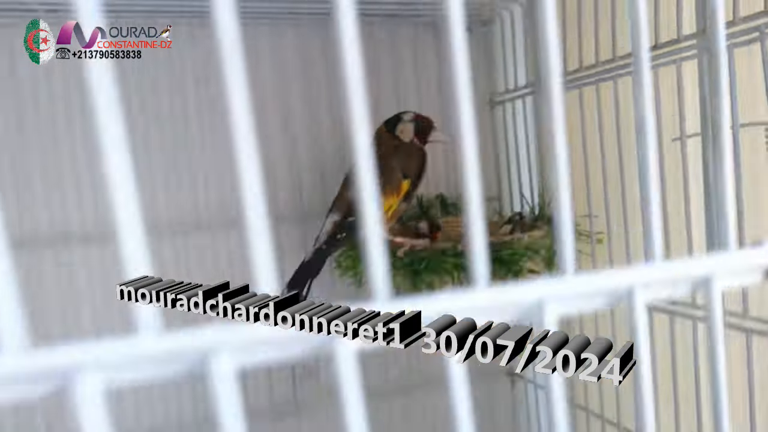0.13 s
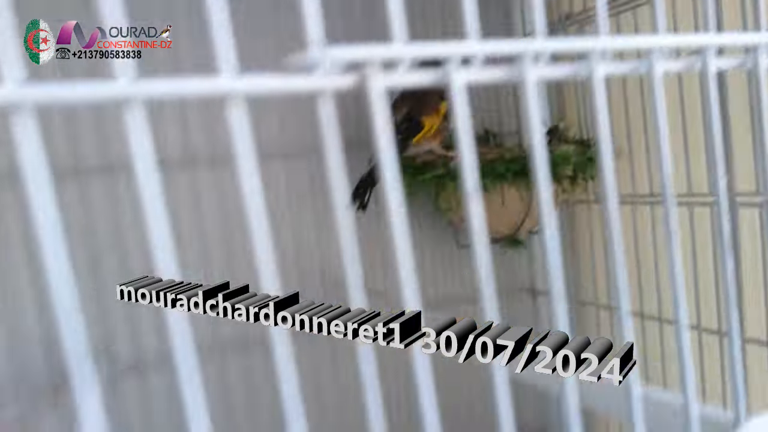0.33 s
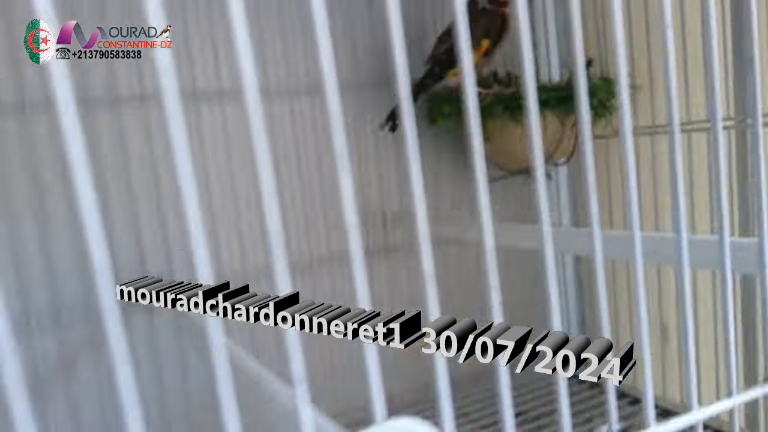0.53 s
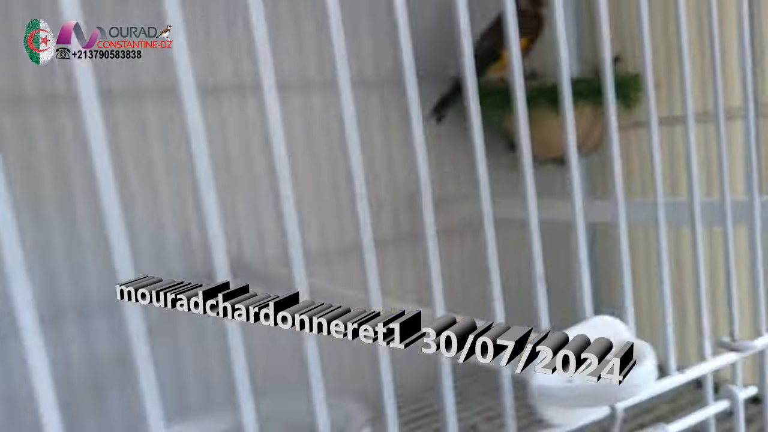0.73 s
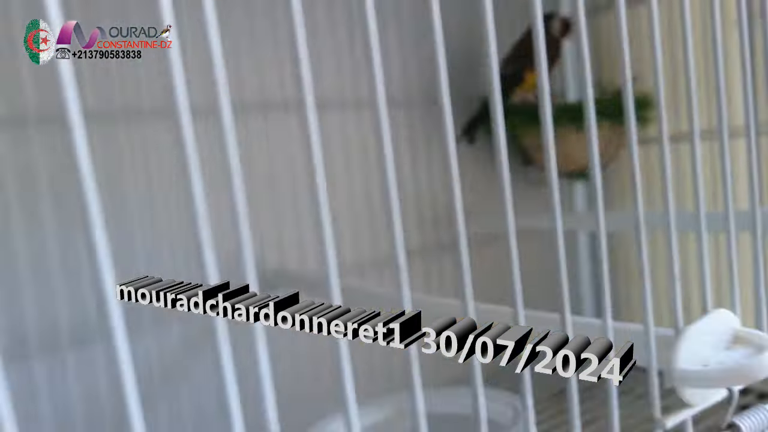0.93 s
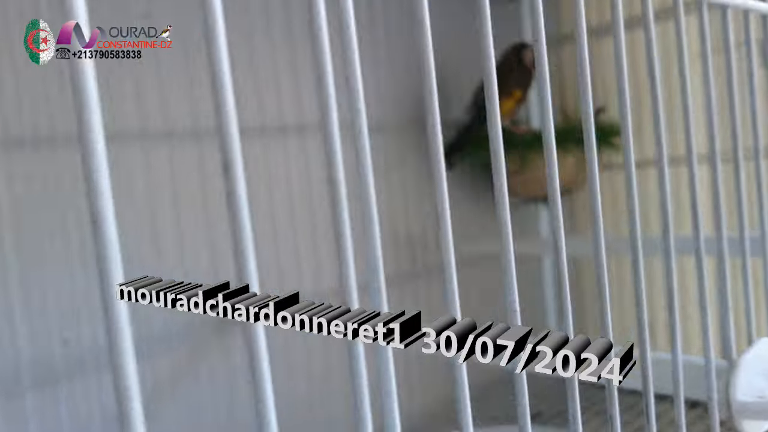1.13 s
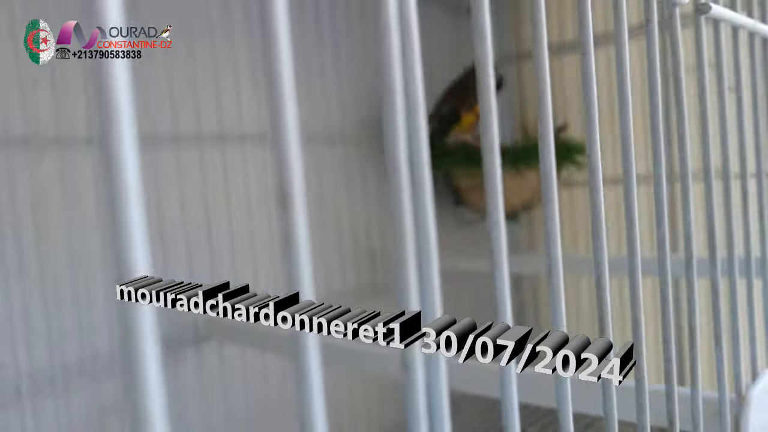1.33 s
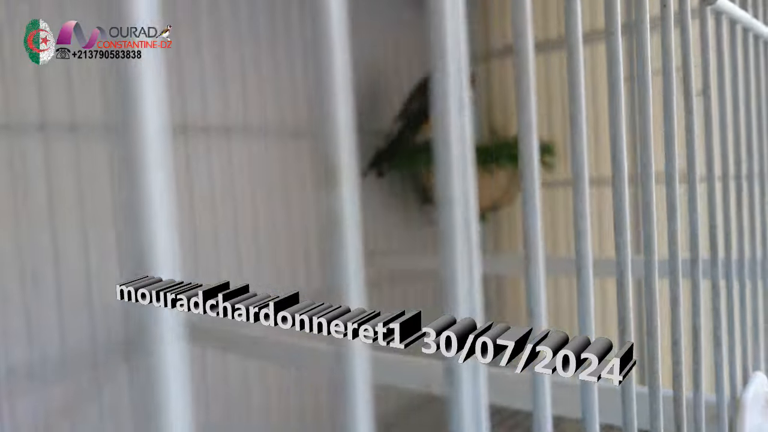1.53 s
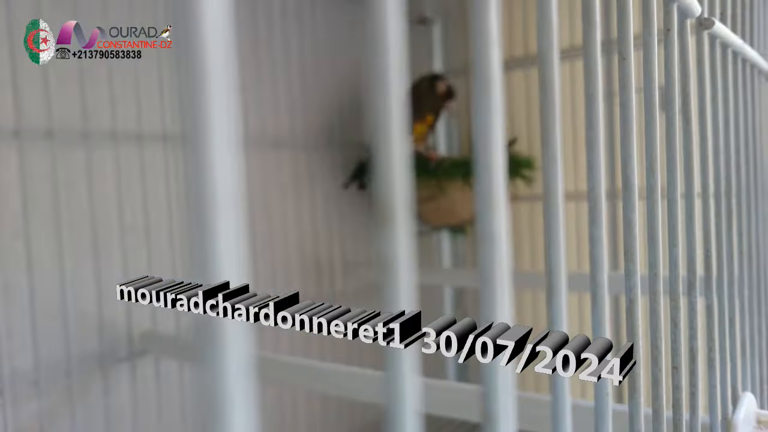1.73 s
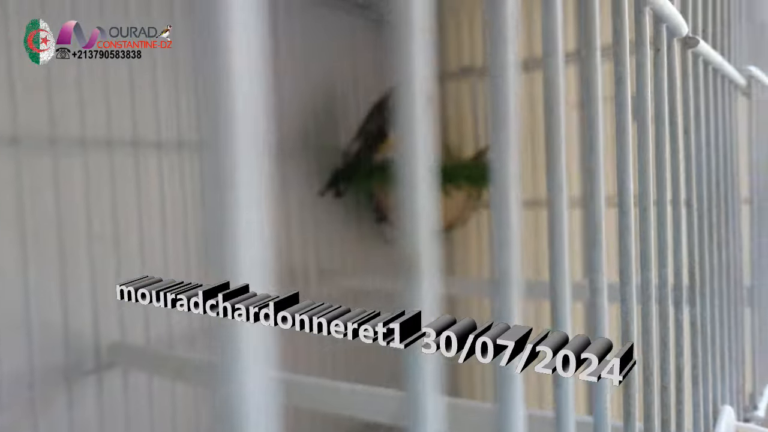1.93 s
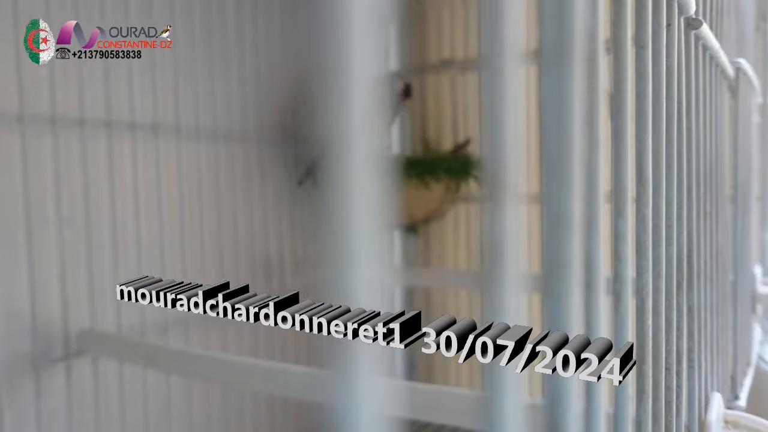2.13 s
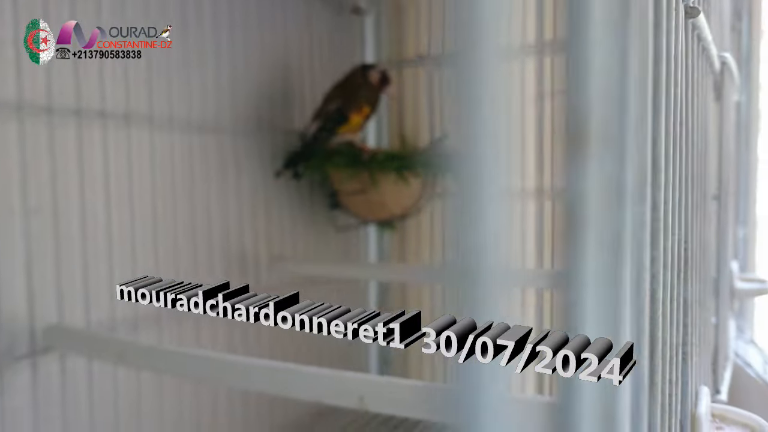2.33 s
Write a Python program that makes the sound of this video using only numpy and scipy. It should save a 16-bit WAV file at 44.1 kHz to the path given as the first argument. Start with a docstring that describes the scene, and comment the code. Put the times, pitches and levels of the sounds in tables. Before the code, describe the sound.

A small caged bird twitters rapidly near the microphone, its short, high, tinkling notes sometimes turning buzzy and ringing slightly in the room. Other birds call faintly farther off over low room noise, and a soft handling bump comes last.

```python
"""A small room with a caged goldfinch close to a phone. The bird twitters in quick gliding whistles
from the two sides of its syrinx; they beat where they overlap and three times flutter into a buzz.
Cage and room ring faintly. Other birds call farther off, a high hiss swells once, and a faint tick and
a dull handling bump sound over low room noise. A smooth limiter keeps the loudest whistles from clipping."""
import sys
import numpy as np
from scipy import signal
from scipy.fft import rfft, irfft
from scipy.io import wavfile
from scipy.ndimage import uniform_filter1d, minimum_filter1d

SR = 44100
rng = np.random.default_rng(int(sys.argv[2]) if len(sys.argv) > 2 else 0)


def put_to_file(sound):
    """Save the sound as 16-bit audio at rate SR, in the file named by the first command-line argument."""
    columns = np.atleast_2d(sound).T  # one column per channel
    safe = np.clip(columns, -1, 1)
    whole_steps = np.round(safe * 32767)
    wavfile.write(sys.argv[1], SR, whole_steps.astype(np.int16))


N = 110250
TIME_S = np.arange(N) / SR
SIDE = np.array([[1], [-1]])  # opposite sign left and right
WAVER_RATE_HZ, ROOM_DELAY_S = 350, 0.0069


def goldfinch():
    """Each side of the syrinx whistles through three pitches; turbulence adds rasp at tone and octave."""
    # whistles of either side: t/s, length/s, f_first/Hz, f_mid/Hz, f_last/Hz, level/dB, peak place/0-1
    whistles = [ (.475, 0.031, 2900, 3306, 3480, -14.5, 0.22), (.492, 0.024, 3780, 3830, 4000, -23.5, 0),
                (0.53, 0.029, 4090, 4310, 4520, -4, 0.42), (.547, 0.034, 4470, 4644, 4750, -9.5, 0),
                (0.641, 0.025, 2455, 2810, 2813, -19, 0.84), (.678, 0.037, 2890, 3790, 3810, -6, 0.45),
                (.744, 0.055, 4030, 5135, 4780, -8, 0.25), (0.743, 0.055, 5270, 5695, 4930, -9, 0.17),
                (1.162, 0.036, 2956, 3074, 2930, -21, 0.2), (1.174, 0.041, 2527, 3307, 3580, -12, 0.47),
                (1.237, 0.028, 2860, 4110, 4150, -3, 0.37), (1.239, 0.022, 4140, 4820, 4710, -13.5, 0.36),
                (1.292, 0.021, 2785, 3117, 3070, -17, 1), (1.312, 0.028, 2740, 3272, 3940, -8.5, 0.52),
                (1.366, 0.034, 2460, 2658, 2560, -18.5, 0.34), (1.396, 0.023, 2900, 3058, 3200, -9.5, 0.81),
                (1.397, 0.031, 3690, 3723, 3960, -13.5, 0.52), (1.440, 0.037, 3644, 4410, 4690, -7, 0.23),
                (1.441, 0.023, 5060, 4920, 5800, -9, 0.46), (1.479, 0.032, 5460, 5927, 5260, -4, 0.78),
                (1.553, 0.026, 2380, 3136, 2940, -23, 0.21), (1.583, 0.017, 2830, 3300, 3800, -14.5, 0.38),
                (1.598, 0.021, 3860, 3882, 4740, -3.5, 0.42), (1.646, .04, 2330, 2910, 3360, -23.5, 0.57),
                (1.647, 0.04, 2920, 4030, 4830, -24, 1), (1.681, 0.034, 3246, 4280, 4270, -9, 0.34),
                (1.677, 0.053, 4700, 5130, 5200, -9.5, 0.23), (1.742, 0.052, 2053, 3500, 3920, -27.5, 0.27),
                (1.762, 0.026, 3990, 4530, 5200, -16.5, 0.02), (1.789, 0.033, 5880, 5290, 5030, -2.5, 0.32),
                (1.8195, 0.022, 3820, 4013, 3780, -3.5, 0.1), (1.867, 0.023, 2300, 2897, 3070, -14.5, 0.54),
                (1.892, 0.053, 5226, 4774, 5020, -1, 0.38), (1.941, 0.019, 3440, 3790, 3500, -5, 0.23),
                (1.984, 0.021, 3000, 4230, 5360, -10.5, 0.5), (2.006, 0.006, 3220, 3890, 3920, -3.5, 0.78),
                (2.010, 0.031, 4280, 4410, 4820, -5.5, 0.19), (2.070, 0.045, 3390, 2770, 3270, -31.5, 0.84),
                (2.101, 0.059, 2760, 3930, 4710, -17, 0.19), (2.105, 0.046, 3880, 4580, 6120, -12.5, 0.28),
                (2.142, 0.039, 5995, 5690, 5500, -2.5, 0.4), (2.173, 0.0089, 5470, 5350, 5300, -8, 0.7),
                (2.181, 0.03, 5240, 4840, 4750, -0.5, 0.34), (2.209, 0.019, 3140, 3850, 3880, -5, 0.61),
                (2.258, 0.033, 2356, 2612, 2550, -26, 0.63), (2.286, 0.02, 2580, 3030, 3540, -18, 0.67),
                (2.310, 0.043, 4810, 4658, 4606, -6.5, 0.46), (2.377, 0.023, 3100, 3867, 3820, -4, 0.6),
                (2.432, 0.028, 2490, 2180, 2160, -25, 0.7), (2.486, 0.04, 3050, 3600, 3700, -4, 0.69), ]
    # tinkle, a low slur and a bright double pip: columns as above, t/s from the start of the figure
    tinkle = [(0, 0.028, 2400, 2975, 3150, -13.5, 0.71), (.055, 0.017, 3458, 3873, 3950, -2.5, 0.67),
              (0.068, .01, 3950, 3880, 3800, -9.5, .45)]
    # starts of the figure: t/s
    tinkle_starts_s = [.8075, .9275, 1.0435]
    song_db, turbulence_db, octave_db, turbulence_width_hz = 1, -30, -50.5, 478
    tone, envelope, rasp = np.zeros((3, N))
    waver = 1 + .008 * slow(WAVER_RATE_HZ)
    eddies = slow(turbulence_width_hz) + 1j * slow(turbulence_width_hz)
    flutter = buzz()
    tinkles = [(at + offset, *shape) for at in tinkle_starts_s for offset, *shape in tinkle]
    for start, length, first, mid, last, db, peak_at in list(whistles) + tinkles:
        on = (TIME_S >= start) & (TIME_S < start + length)
        u = (TIME_S[on] - start) / length
        hz = mid + (last - first) * (u - .5) + 2 * (first + last - 2 * mid) * (u - .5) ** 2
        phase_rad = 2 * np.pi * np.cumsum(hz * waver[on]) / SR + 1.24 * flutter[on]
        strength = undb(db) * swell(u, peak_at)
        tone[on] += strength * np.sin(phase_rad)
        partials = undb(turbulence_db) * np.exp(1j * phase_rad) + undb(octave_db) * np.exp(2j * phase_rad)
        rasp[on] += strength ** .45 * np.real(eddies[on] * partials)
        envelope[on] += strength
    voice = undb(song_db) * (tone + overtones(tone, envelope)) * (1 + flutter)
    return voice + butter(rasp, 4, hz=10000)


def buzz():
    """Fast, jittery flutter that shakes the pitch and strength of the voice."""
    # buzzes: t/s, length/s, depth/0-1
    buzzes = [(0.675, 0.041, 0.81), (1.676, 0.062, 0.6), (2.003, 0.06, 0.66)]
    depth = sum(peak * swell((TIME_S - at) / length, .63) for at, length, peak in buzzes)
    flutter_hz = 338 * (1 + .39 * slow(WAVER_RATE_HZ))
    return depth * sine(flutter_hz)


def overtones(tone, envelope):
    """Flickering third overtones of both voices, entering after the opening notes."""
    onset_s = .73
    cubed = undb(-15.5) * (TIME_S > onset_s) * tone ** 3 / np.maximum(envelope, 1e-6)
    return butter(cubed, 4, hz=8000, kind="highpass") * (1 + .5 * slow(WAVER_RATE_HZ))


def reflections(song):
    """Echo off the back wall of the cage, short scatter inside it, and the room's stereo ring."""
    echo_db, cage_db, room_db, echo_delay_s = -19.5, -33.5, -33, .0092
    echo = np.interp(TIME_S - echo_delay_s, TIME_S, song)
    cage = reverb(song, t60_s=.022, delay_s=.0015)
    mid, side = (reverb(song, t60_s=1, delay_s=ROOM_DELAY_S) for _ in range(2))
    return undb(echo_db) * echo + undb(cage_db) * cage + undb(room_db) * (mid + .5 * side * SIDE)


def far_birds():
    """Soft whistles, each wavering about one pitch, that linger in the room."""
    # distant calls: t/s, f/Hz, level/dB
    calls = [(0, 3650, -52), (0.062, 5750, -44), (0.059, 6660, -50), (0.211, 3660, -45.5),
             (.282, 5750, -47), (0.287, 6650, -47.5), (0.36, 4670, -48), (0.376, 4360, -45.5),
             (.505, 6050, -39), (0.696, 6120, -43.5), (0.906, 6020, -35.5), (1.605, 6550, -40.5),
             (2.0, 6520, -45)]
    length_s = .054
    waver = 1 + .009 * slow(WAVER_RATE_HZ)
    direct = sum(undb(db) * swell((TIME_S - at) / length_s, .59) * sine(hz * waver) for at, hz, db in calls)
    return direct + .5 * reverb(direct, t60_s=.54, delay_s=ROOM_DELAY_S)


def handling_knocks():
    """A faint tick and a dull handling bump: fast-decaying noise bursts."""
    # tick and bump: t/s, level/dB, decay/s, f_edge/Hz
    knocks = [(0.153, -38, 0.012, 4500), (2.469, -27.5, 0.018, 1200)]
    out = np.zeros(N)
    for at, db, decay_s, edge_hz in knocks:
        envelope = (TIME_S >= at) * np.exp(-np.abs(TIME_S - at) / decay_s)
        out = out + undb(db) * envelope * wide([(edge_hz, 0), (10 * edge_hz, -70)])
    return out


def rustle():
    """A soft high hiss swells, sinks in pitch and fades."""
    start_s, length_s = 1.13, .18
    u = (TIME_S - start_s) / length_s
    centre_hz = np.interp(u, [0, 1], [6850, 4970])
    return undb(-36) * band(hz=(20, 1400)) * sine(centre_hz) * swell(u, .77)


def chatter():
    """Uneven airy wash, as of many distant birds, setting in with the song."""
    start_s, rise_s = .41, .1
    level_db = -50.5 + 4.5 * slow(hz=14)
    return undb(level_db) * band(hz=(3000, 6680)) * np.clip((TIME_S - start_s) / rise_s, 0, 1)


def room_noise():
    """Wide low noise, slowly easing, with faint hiss, hum and one swell of rumble."""
    # low noise spectrum: f/Hz, relative level/dB
    air_spectrum = [(24, -31), (40, -1), (250, -8), (1270, -14.5), (1800, -18.5), (2340, -18), (3960, -120)]
    # hiss spectrum: f/Hz, relative level/dB
    hiss_spectrum = [(1500, -11.5), (5000, 0.5), (7000, -15.5), (10000, -28.5)]
    hum_hz, rumble_hz, rumble_start_s, rumble_length_s = 346, 64, .52, .42
    hum = np.sqrt(2) * np.sin(2 * np.pi * hum_hz * TIME_S + slow(hz=23))
    rumble = np.sqrt(2) * np.sin(2 * np.pi * rumble_hz * TIME_S + slow(hz=27))
    rumble *= swell((TIME_S - rumble_start_s) / rumble_length_s, .76)
    air = undb(-47.5 - 2.5 * TIME_S) * wide(air_spectrum)
    return air + undb(-59) * coloured(hiss_spectrum) + undb(-63) * hum + undb(-48) * rumble


def reverb(x, t60_s, delay_s):
    """Diffuse, band-limited ring that builds up after a delay."""
    tail = band(hz=(1800, 10160)) * undb(-60 * TIME_S / t60_s) * np.clip(TIME_S / delay_s - 1, 0, 1)
    return signal.fftconvolve(x, tail / np.sqrt(np.sum(tail ** 2)))[:N]


def swell(u, peak_at):
    """Rounded rise and fall over u = 0-1, silent outside."""
    peak_at = np.clip(peak_at, .1, .9)
    arch = np.abs(np.sin(np.pi * np.interp(u, [0, peak_at, 1], [0, .5, 1])))
    return arch ** np.where(u < peak_at, 1.65, 1.8)


def sine(hz):
    """Sine following a pitch curve."""
    return np.sin(2 * np.pi * np.cumsum(hz) / SR)


def slow(hz):
    """Random motion up to about hz, rms 1."""
    return unit(butter(rng.standard_normal(N), 2, hz))


def band(hz):
    """Noise between two edges, rms 1."""
    return unit(butter(rng.standard_normal(N), 6, hz, "bandpass"))


def coloured(spectrum):
    """Noise shaped by (f/Hz, level/dB) points, rms 1."""
    hz, db = np.array(spectrum).T
    bins_hz = np.maximum(np.fft.rfftfreq(N, 1 / SR), 1)
    gain = undb(np.interp(np.log(bins_hz), np.log(hz), db))
    return unit(irfft(rfft(rng.standard_normal(N)) * gain, N))


def wide(spectrum, side_db=-5):
    """Coloured stereo noise, rms 1."""
    return unit(coloured(spectrum) + undb(side_db) * coloured(spectrum) * SIDE)


def butter(x, order, hz, kind="lowpass"):
    return signal.sosfilt(signal.butter(order, hz, kind, fs=SR, output="sos"), x)


def undb(db):
    return 10 ** (np.asarray(db) / 20)


def unit(x):
    return x / np.sqrt(np.mean(x ** 2))


def scene():
    """The bird straight ahead, cage and room around it."""
    song = goldfinch()
    return song + reflections(song) + far_birds() + chatter() + rustle() + handling_knocks() + room_noise()


def record(dry):
    """A smooth limiter keeps the loudest whistles from clipping; then a steep treble cut."""
    ceiling, window_samples, top_hz = .95, 265, 15800
    needed_gain = ceiling / np.maximum(np.abs(dry).max(axis=0), ceiling)
    gain = uniform_filter1d(minimum_filter1d(needed_gain, window_samples), window_samples)
    return signal.sosfilt(signal.ellip(8, .1, 70, top_hz, fs=SR, output="sos"), dry * gain)


dry = scene()
out = record(dry)
put_to_file(out)
```